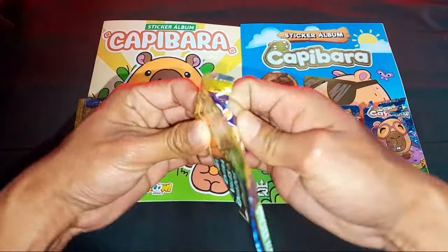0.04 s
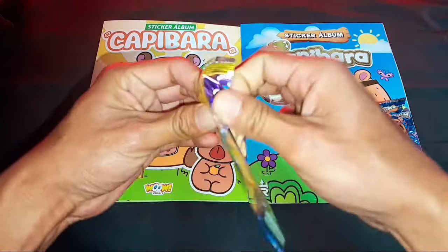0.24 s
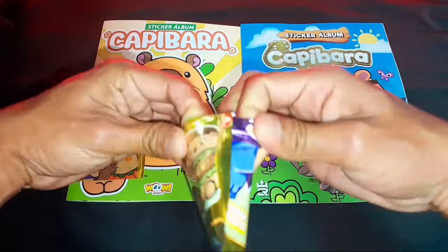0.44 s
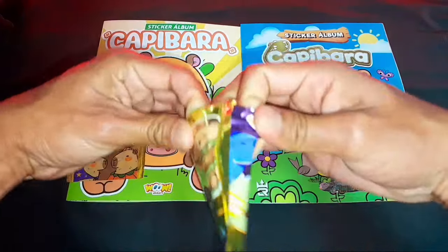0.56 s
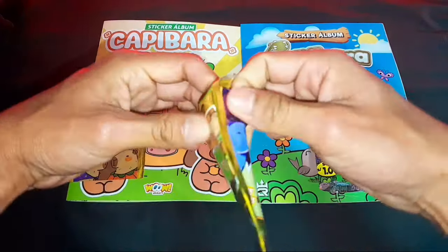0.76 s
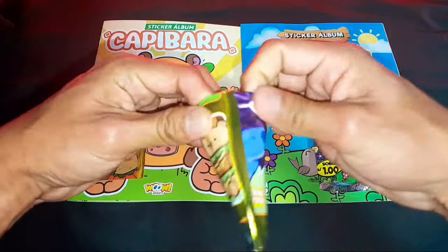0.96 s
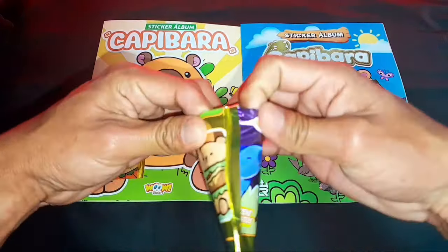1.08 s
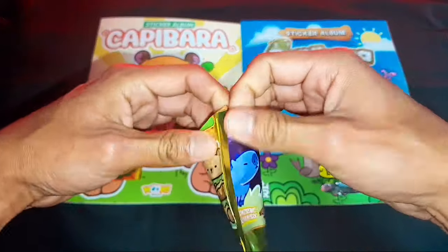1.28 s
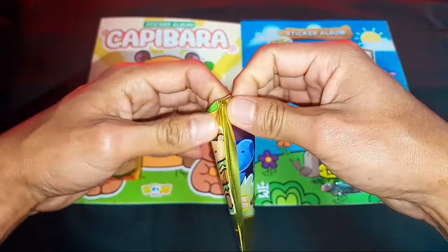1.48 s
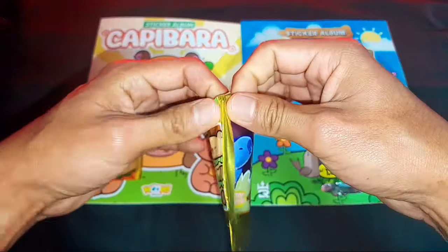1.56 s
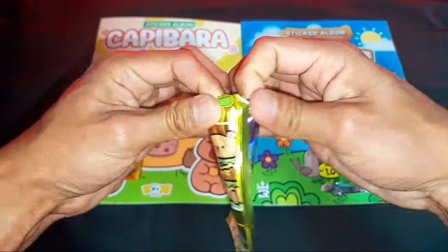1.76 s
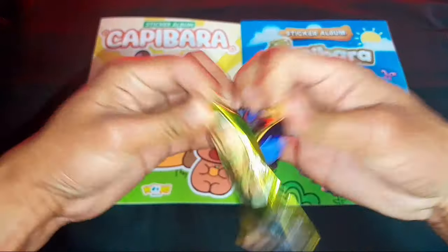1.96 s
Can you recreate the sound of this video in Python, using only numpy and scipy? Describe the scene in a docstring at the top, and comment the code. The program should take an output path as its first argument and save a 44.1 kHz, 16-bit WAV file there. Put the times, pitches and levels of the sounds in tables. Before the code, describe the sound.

Close, bright foil crackling from a small packet being pulled open: uneven clusters of snaps, soft finger thumps and rustle, a sparse lull, then a dense tearing flurry, with faint indoor reflections and low rumble.

```python
"""A quiet room, a small recorder with two microphones close to a thin foil packet that two hands crinkle open.
Each foil snap is a millisecond burst of random buckles, bright, with short rings of the crease and larger panels.
Random small snaps make the fine crackle; decaying low sines are fingers thumping the packet.
A narrow noisy ring squeaks as the seal peels, and filtered noise gives finger rustle and low rumble.
A few table echoes and a decaying random tail answer the packet."""
import sys
import numpy as np
from scipy import signal
from scipy.io import wavfile
from scipy.ndimage import uniform_filter1d

SR = 44100
rng = np.random.default_rng(int(sys.argv[2]) if len(sys.argv) > 2 else 0)


def master_out(mix):
    """Clip the mix to full scale and print it as 16-bit PCM to the path in sys.argv[1]."""
    frames = np.transpose(np.atleast_2d(mix))
    ceiling = np.clip(frames, -1, 1)
    pcm = np.round(ceiling * 32767).astype(np.int16)
    wavfile.write(sys.argv[1], SR, pcm)


N = 89390  # length [samples]


def amp(db):
    """Decibels to amplitude."""
    return 10 ** (np.asarray(db) / 20)


def unit(x):
    """Energy one along the last axis."""
    return x / np.sqrt(np.sum(x ** 2, -1, keepdims=True) + 1e-20)


def unit_rms(x):
    """RMS one over the whole length."""
    return unit(x) * np.sqrt(N)


def read(points, hz):
    """Read a (frequency, value) table along a logarithmic frequency axis."""
    f, value = np.transpose(points)
    return np.interp(np.log(hz + 1), np.log(f + 1), value)


def curve(points, axis=1):
    """Draw one column of a timed table as straight lines over the whole length."""
    rows = np.transpose(points)
    return np.interp(np.arange(N) / SR, rows[0], rows[axis])


def add(mix, s, sound):
    """Lay a sound into the mix from time s [s], cut at the end."""
    part = mix[..., round(s * SR):][..., :sound.shape[-1]]
    part += sound[..., :part.shape[-1]]


def above(x, hz, order=3):
    """Keep what lies above a frequency."""
    return signal.sosfilt(signal.butter(order, hz, "high", fs=SR, output="sos"), x)


def band(x, edges_hz, order):
    """Keep what lies between two frequencies."""
    return signal.sosfilt(signal.butter(order, edges_hz, "band", fs=SR, output="sos"), x)


def decaying_sine(t, hz, width_hz):
    """Ring of a resonance: the wider its band, the sooner it dies."""
    return np.exp(-np.pi * width_hz * t) * np.sin(2 * np.pi * hz * t)


# how long the room rings in each band: (frequency [Hz], time to fall 60 dB [s])
ROOM_DECAY = [(200, 0.49), (1000, 0.25), (4000, 0.33), (8000, 0.094), (15000, 0.52)]
# first echoes, off the table: (delay [s], level [dB])
TABLE_ECHOES = [(.0016, -20.5), (.0042, -16.5), (.012, -27)]
TAIL_DB, TAIL_GAP_S = -9.5, .004  # energy of the tail, silence before it
TAP_SPACING = 20  # samples


def room(x):
    """A few table echoes, then sparse random taps dying band by band."""
    start = np.arange(round(TAIL_GAP_S * SR), 26000, TAP_SPACING)
    shape = (2, len(start))
    # one tap of random sign, randomly placed in each short slot
    places = start + rng.integers(0, TAP_SPACING, shape)
    taps = np.zeros((2, 26100))
    np.put_along_axis(taps, places, rng.choice([-1., 1.], shape), 1)
    hz, t, bands = signal.stft(taps, SR, nperseg=128)
    decay = amp(-60 * t / read(ROOM_DECAY, hz)[:, None])
    tail = amp(TAIL_DB) * unit(signal.istft(bands * decay, SR, nperseg=128)[1])
    for s, db in TABLE_ECHOES:
        add(tail, s, amp(db) * np.ones((2, 1)))
    return signal.fftconvolve(x, tail, axes=1)[:, :N]


# hands shaking the table and brushing the packet, levels before the microphone colour:
# (time [s], rumble level [dB], finger rustle level [dB])
HAND_NOISE = [(0, -69, -45), (.2, -61, -59), (.37, -62.5, -39), (.51, -59, -42), (.57, -60, -49.5),
              (.66, -49, -45.5), (.78, -61, -55.5), (.92, -51.5, -50.5), (1.15, -63, -48), (1.35, -66, -61),
              (1.46, -54, -79), (1.6, -65.5, -62), (1.8, -62, -64.5), (1.95, -51.5, -37)]


def air():
    """Low noise rumble, partly shared by both microphones."""
    noise = rng.standard_normal((3, N))
    low = band(noise[0] + 1.2 * noise[1:], [45, 130], 2)
    return unit_rms(low) * amp(curve(HAND_NOISE))


RUSTLE_HZ, HOLLOW_HZ = (135, 690), 403  # band of the rustle, hollow note
HOLLOW_DB, LUMP_DB = 8.5, 5.5  # gain of the hollow note, RMS swing of the slow lumps


def rustle():
    """Lumpy low noise of fingers on the packet, with one hollow resonance."""
    noise, lumps = rng.standard_normal((2, N))
    low = band(noise, RUSTLE_HZ, 3)
    low = low + amp(HOLLOW_DB) * signal.lfilter(*signal.iirpeak(HOLLOW_HZ, 14, SR), low)
    for _ in range(2):
        lumps = uniform_filter1d(lumps, size=400)
    lumpy = low * amp(LUMP_DB * unit_rms(lumps))
    return unit_rms(lumpy) * amp(curve(HAND_NOISE, axis=2))


# fingers bumping the packet: (time [s], envelope peak before room and microphones [dB], pitch [Hz])
FINGER_THUMPS = [(0.1219, -20.5, 626), (0.376, -19.5, 397), (0.497, -39, 216), (0.644, -21, 583),
                 (0.996, -31, 190), (1.173, -22, 386), (1.281, -28.5, 644), (1.526, -25.5, 420),
                 (1.975, -28, 317), (2.019, -25, 272)]
THUMP_TURNS = 1.6  # cycles until three times the envelope's peak time


def thumps():
    """Soft low knocks: sines of a few cycles that swell quickly and die."""
    out, t = np.zeros(N), np.arange(2000) / SR
    for s, db, hz in FINGER_THUMPS:
        u = t * hz / THUMP_TURNS * 3
        envelope = u * np.exp(1 - u)
        add(out, s, amp(db) * envelope * np.sin(2 * np.pi * hz * t))
    return out


# the seal squeaking as it peels: (time [s], length of the slipping [s], level [dB])
SEAL_SQUEAKS = [(1.888, 0.016, -23.5), (1.927, 0.0063, -20.5), (1.965, 0.015, -18)]
SEAM_HZ, SEAM_WIDTH_HZ = 4140, 460


def seam():
    """Short rough squeaks: random slips exciting one narrow ring."""
    out, t = np.zeros(N), np.arange(600) / SR
    ring = unit(decaying_sine(t, SEAM_HZ, SEAM_WIDTH_HZ))
    for s, length, db in SEAL_SQUEAKS:
        n = round(length * SR)
        slips = rng.standard_normal(n) * np.hanning(n)
        add(out, s, amp(db) * np.convolve(slips, ring))
    return out


BURST_S, RISE_S = 0.0013, 0.0004  # middle decay time of a burst, its rise
BUCKLE_SPREAD_DB, LEAD = 4.5, 2.0  # spread of buckle sizes, first strong buckle over their RMS
BRIGHT_HZ, RING_FLOOR_HZ = 5000, 850  # high-pass corners of the bright part and of the rings
CREASE_HZ, CREASE_WIDTH_HZ, CREASE_DRIFT = 3714, 1110, 0.13  # drift: spread of log pitch
PANEL_WIDTH_HZ = 595
PUSH_HZ, PUSH_DB = (133, 704), -20  # low push of air under a snap, re the panel ring
OWN_SHARE, OWN_RING_SHARE = 0.76, 0.15  # energy share each microphone hears on its own: bright part, rings
PAN_SPREAD_DB = 1.5  # largest gain or loss at a microphone


def snap(bright_db, panel_db, panel_hz, crease_db, push_db=PUSH_DB):
    """Foil buckles in a burst, bright and through short rings, partly alike at the two microphones."""
    t = np.arange(400) / SR
    length, pan = rng.random(2)
    drift = rng.standard_normal()
    # one shared stream of buckles and one for each microphone
    buckles = rng.standard_normal((3, 400)) * amp(BUCKLE_SPREAD_DB * rng.standard_normal((3, 400)))
    buckles[:, round(RISE_S * SR)] = LEAD * np.std(buckles) * np.sign(drift)
    buckles = buckles * np.minimum(t / RISE_S, 1) * np.exp(-t / (BURST_S * (.5 + length)))

    def at_microphones(own):
        return np.sqrt(1 - own) * buckles[0] + np.sqrt(own) * buckles[1:]

    high, low = at_microphones(OWN_SHARE), at_microphones(OWN_RING_SHARE)

    def ringing(hz, width_hz):
        rung = signal.fftconvolve(low, [decaying_sine(t, hz, width_hz)])[:, :400]
        return unit(above(rung, RING_FLOOR_HZ, order=5))

    panel = ringing(panel_hz, PANEL_WIDTH_HZ)
    crease = ringing(CREASE_HZ * np.exp(CREASE_DRIFT * drift), CREASE_WIDTH_HZ)
    push = amp(push_db) * unit(signal.lfilter(*signal.butter(1, PUSH_HZ, "band", fs=SR), low))
    sound = amp(bright_db) * unit(above(high, BRIGHT_HZ))
    sound = sound + amp(panel_db) * (panel + push) + amp(crease_db) * crease
    return sound * amp(PAN_SPREAD_DB * (2 * pan - 1) * np.array([[1], [-1]]))


# fine crackle of the foil being worked: (time [s], level before the three part levels below [dB])
FINE_CRACKLE = [(0, -34), (.03, -49.5), (.1, -59), (.12, -25), (.14, -37.5), (.285, -39), (.31, -21),
                (.39, -26.5), (.44, -38.5), (.5, -36.5), (.555, -38.5), (.65, -26.5), (.7, -44.5),
                (.75, -34.5), (.79, -46.5), (.9, -26.5), (.94, -73), (1.0, -29), (1.03, -49.5), (1.2, -37),
                (1.35, -55), (1.5, -56), (1.53, -24), (1.56, -52), (1.62, -40.5), (1.65, -30), (1.69, -51),
                (1.77, -45.5), (1.86, -46.5), (1.89, -19.5), (1.945, -27.5), (1.975, -22), (2.03, -46)]
CRACKLE_PER_S, CRACKLE_SPREAD_DB = 850, 5.5  # mean rate of small snaps, scale of their sizes
CRACKLE_BRIGHT_DB, CRACKLE_RING_DB, CRACKLE_CREASE_DB = 2, -3, -8.5
CRACKLE_PUSH_DB = -30  # re the panel ring
CRACKLE_PANEL_HZ = (1280, 2500)  # range of panel pitches


def crackle(count=24):
    """Many small snaps at random, of a few kinds, some much larger than the rest."""
    happens = rng.random(N) < CRACKLE_PER_S / SR
    size = happens * amp(CRACKLE_SPREAD_DB * np.minimum(rng.exponential(1, N), 3))
    size = unit_rms(size) * amp(curve(FINE_CRACKLE))
    kind = rng.integers(0, count, N)
    out = np.zeros((2, N))
    for k, hz in enumerate(np.geomspace(*CRACKLE_PANEL_HZ, count)):
        grain = snap(CRACKLE_BRIGHT_DB, CRACKLE_RING_DB, hz, CRACKLE_CREASE_DB, CRACKLE_PUSH_DB)
        out += signal.oaconvolve([size * (kind == k)], grain, axes=1)[:, :N]
    return out


# single snaps of the foil, loud and soft, levels as burst energy before room and microphones:
# (time [s], brightness [dB], panel ring [dB], panel pitch [Hz], crease ring [dB])
SINGLE_SNAPS = [(0.0617, -7.5, -23.5, 2130, -20), (0.0677, -2.5, -27, 2500, 0),
                (0.0818, -2.5, -22, 2430, -4.5), (0.1214, 8, -6, 2900, 1), (0.1597, 3.5, -9, 1180, -14),
                (0.2006, 5.5, -26, 2430, -3.5), (0.2188, 10.5, -4.5, 2470, -24), (0.2384, 7, -1.5, 2520, 0),
                (0.2906, 3, -28, 2430, -2.5), (0.299, 11.5, -11, 2370, 4), (0.3118, 8, 3.5, 2300, 5),
                (0.3385, -1, -0.5, 1960, -21), (0.3397, 14, -6, 1870, -16), (0.3582, 8, -6, 2630, -8),
                (0.3607, 9.5, 5.5, 1750, -4), (0.37, 14, 2, 1890, -15), (0.3766, 8, 3, 1440, -4.5),
                (0.3917, -9, 4, 1210, -4), (0.41, 3, -6, 1710, -27), (0.5011, -13, -6, 1710, -25),
                (0.5703, 7, -4, 1450, -4), (0.6041, 4.5, -5, 1910, 4), (0.6106, 7.0, -3, 1360, -3),
                (0.6245, 7.5, -11, 1290, 0), (0.6416, 8, 1.5, 1500, -3.5), (0.648, 6, -17, 1180, -5),
                (0.6717, 5, -15, 2370, -17), (0.7499, 0.5, 1.5, 2030, -8), (0.76, 5.5, -13, 1970, -2),
                (0.808, 5, -21.5, 2360, -4), (0.8291, 7, -15, 2050, -17), (0.853, 7, -0.5, 2240, -28),
                (0.8694, 5, -8.5, 2350, -34), (0.8838, 5.5, -3, 2320, -31), (0.9071, 9.5, -5, 2250, -7.5),
                (0.9238, 6, 1, 2040, 0), (0.9501, 6, -20, 2430, -12), (0.9939, 6.5, 2, 1460, -12),
                (0.9991, 5.5, 1, 2300, -1.5), (1.0888, 2, 4, 1610, 0.5), (1.1037, 4, -2, 1460, -1.5),
                (1.1195, 0, -2, 1330, -20), (1.1412, 7, -4.5, 2230, 0), (1.152, 6, -8.5, 2460, -2),
                (1.1735, -13, 0.5, 1280, -12), (1.2818, 5, 0, 2260, -4.5), (1.4101, -1, -22, 1970, -11.5),
                (1.4592, -6, -55, 2650, -21), (1.4912, 6.5, -9, 2230, -4.5), (1.526, 6.5, -5.5, 1130, -29),
                (1.5292, 8, -5.5, 1170, 1), (1.5331, 5.5, -2.5, 1840, -9), (1.5716, -5.5, -25, 2670, -9),
                (1.6017, 6, -6.5, 1900, -32), (1.63, 5.5, 0.5, 2620, -10.5), (1.638, 9.5, -6, 2410, 0),
                (1.648, 1.5, -5, 2280, -13), (1.8202, 1.0, -19, 2410, -7.5),
                (1.8343, 5.5, -10.0, 1800, -4.5), (1.8809, 9.5, 0.5, 1510, -14), (1.8901, 4, 7, 1170, 6),
                (1.8966, 4, -16, 1480, 8), (1.918, -1, 4, 1420, 2), (1.9299, 6.5, -4, 1880, 2),
                (1.9783, 3.5, -1, 2230, -10), (1.9894, 11.5, -3, 2050, -11.5), (2.0015, -2, -8, 1660, -7)]


def snaps():
    """Creases of the foil buckling, each at its own time."""
    out = np.zeros((2, N))
    for s, *levels in SINGLE_SNAPS:
        add(out, s, snap(*levels))
    return out


def scene():
    """The packet in the hands, the room's answer, and the rumble."""
    packet = rustle() + thumps() + seam() + crackle() + snaps()
    return packet + room(packet) + air()


def colour(x, points):
    """Causal minimum-phase filter with the given gain over frequency."""
    log_gain = np.log(amp(read(points, abs(np.fft.fftfreq(2048, 1 / SR)))))
    phase = -signal.hilbert(log_gain).imag
    taps = np.fft.ifft(np.exp(log_gain + 1j * phase)).real[:1024]
    return signal.oaconvolve(x, taps)[:N]


# colour of the left microphone: (frequency [Hz], gain [dB])
LEFT_COLOUR = [(60, 0), (1000, -6.5), (4000, 7.5), (5200, 3), (6200, 9), (7200, 14.5), (7900, 7),
               (8700, -11.5), (10500, -15), (13500, -9.5), (16000, -14.5)]
# colour of the right microphone: (frequency [Hz], gain [dB])
RIGHT_COLOUR = [(60, -3.5), (1000, -11), (4000, 0.5), (5000, 1.5), (7200, 0.5), (8000, -8.5), (8800, -9),
                (12000, -10.5), (16000, -16)]
RIGHT_LAG = 4  # samples
CLIP = .95  # of full scale
LOW_EDGE_HZ, HIGH_EDGE_HZ = 29, 16200


def record(dry):
    """Each microphone has its own colour, the right one is farther; high peaks clip; then the band limits."""
    right = np.concatenate([np.zeros(RIGHT_LAG), dry[1]])[:N]
    heard = np.array([colour(dry[0], LEFT_COLOUR), colour(right, RIGHT_COLOUR)])
    heard = above(np.clip(heard, -CLIP, CLIP), LOW_EDGE_HZ)
    low_pass = signal.firwin(255, HIGH_EDGE_HZ, window=("kaiser", 9), fs=SR)
    return signal.oaconvolve(heard, low_pass[None], "same")


dry = scene()
out = record(dry)
master_out(out)
```